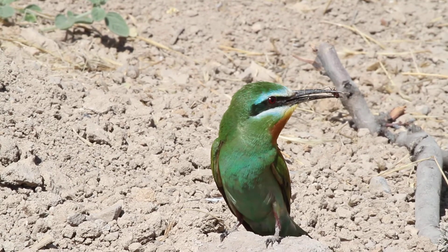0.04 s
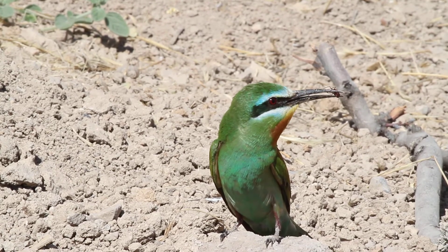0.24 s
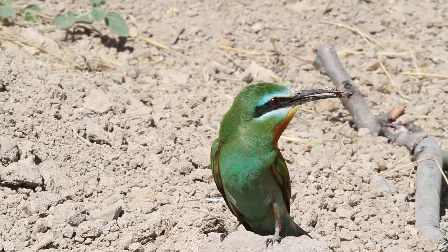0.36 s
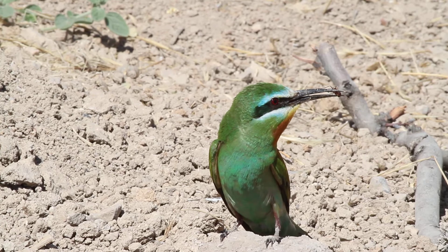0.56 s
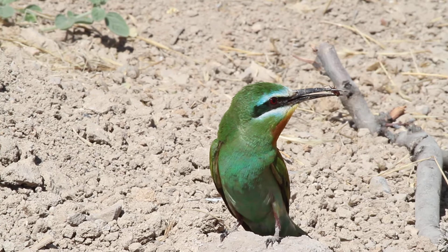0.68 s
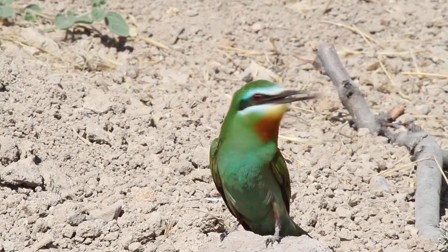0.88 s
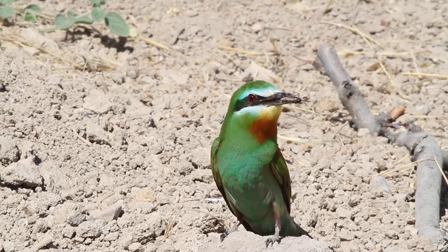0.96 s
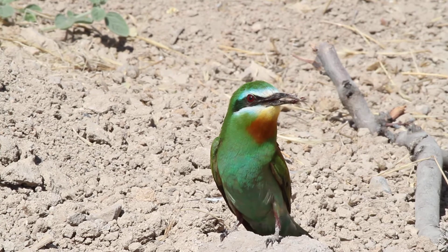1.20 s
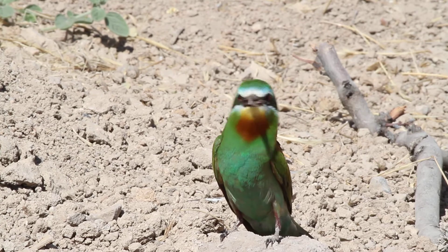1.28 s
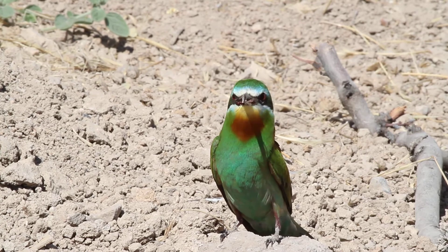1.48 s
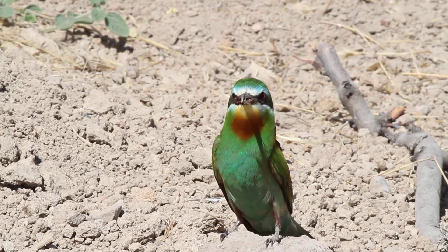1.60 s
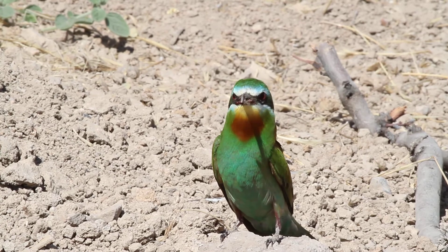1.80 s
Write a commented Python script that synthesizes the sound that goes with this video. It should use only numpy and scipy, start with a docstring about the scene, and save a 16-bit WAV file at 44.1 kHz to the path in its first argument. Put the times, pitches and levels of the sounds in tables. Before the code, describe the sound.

Bird calls outdoors: sharp paired sparrow-like chirps with low rolling bee-eater whistles over faint air

```python
"""Faint air and a distant chorus of blurred twitter, both of shaped noise or arched tones, lie over dry open ground.
Bee-eaters give low rolling whistles, which are nearly pure tones along pitch curves, from faint to clear.
A sparrow-like bird repeats a paired chirp: each rasps in, then both sides of its syrinx sing beating arches.
Short arched notes, among them a two-voiced chirp near 1 s, and two soft noise thumps fall between; the ground
returns a diffuse tail to the birds; the sound is mono."""
import sys
import numpy as np
from scipy import signal
from scipy.fft import rfft, irfft
from scipy.io import wavfile
from scipy.ndimage import uniform_filter1d

SR = 44100
rng = np.random.default_rng(int(sys.argv[2]) if len(sys.argv) > 2 else 0)


def wrap_up_sound(samples):
    """Save the sound to the file named by the first command line argument, as 16-bit audio."""
    columns = np.atleast_2d(samples).T
    # keep every value between -1 and 1, then stretch to whole-number steps
    tamed = np.clip(columns, -1, 1)
    steps = np.round(tamed * 32767).astype(np.int16)
    wavfile.write(sys.argv[1], SR, steps)


N = 81585
T = np.arange(N) / SR  # time [s]

# spectrum of the distant chorus: (frequency [Hz], level [dB])
CHORUS_SPECTRUM = [(1500, -24.5), (2500, -14.5), (3700, -2), (5600, -3.5), (7200, -15), (11000, -24.5),
                   (15500, -40)]
# spectrum of the breath hiss in whistles and notes: (frequency [Hz], level [dB])
BREATH_SPECTRUM = [(1500, -24), (2700, -11), (3700, 3), (5800, 3), (7300, -16), (11000, -8), (15500, -31)]


def undb(db):
    """Amplitude ratio: 20 dB is a factor of ten."""
    return 10 ** (np.asarray(db) / 20)


def colour(x, points):
    """Linear filtering: each frequency is weighted by a response of (frequency [Hz], gain [dB]) points."""
    hz, db = np.array(points).T
    f = np.maximum(np.arange(N // 2 + 1) * SR / N, 1)
    response_db = np.interp(np.log(f), np.log(hz), db)
    return irfft(rfft(x) * undb(response_db), N)


def noise(points):
    """Filtered Gaussian noise: white noise takes the spectrum of the points, at rms 1."""
    y = colour(rng.standard_normal(N), points)
    return y / y.std()


def wobble(hz):
    """Low-passed random motion: amplitude is halved at the given rate and falls above; standard deviation 1."""
    f = np.arange(N // 2 + 1) * SR / N
    y = irfft(rfft(rng.standard_normal(N)) / (1 + (f / hz) ** 2), N)
    return y / y.std()


def glide(times, values, size=110):
    """Piecewise-linear control, its corners rounded by a moving average of size samples."""
    return uniform_filter1d(np.interp(T, np.sort(times), values), size)


def loudness(times, db, size=130):
    """Amplitude envelope: gain through dB points, silent outside them, smoothed over size samples."""
    sounding = (T > min(times)) * (T < max(times))
    return uniform_filter1d(undb(np.interp(T, np.sort(times), db)) * sounding, size)


def turn(hz):
    """Phase [rad] as the time integral of a moving frequency."""
    return 2 * np.pi * np.cumsum(hz) / SR


def scatter(x):
    """Diffuse scattering: rough ground and bushes return a decaying noise tail, by convolution."""
    tail_spectrum = [(500, 0), (2000, -10.5), (3500, -9), (6000, -6.5), (12000, -0.5), (16000, -3)]  # (frequency [Hz], level [dB])
    level_db, t60_s, delay_s = -10.5, 0.19, 0.0047
    decay = np.exp(-np.log(1000) * T / t60_s)
    tail = noise(tail_spectrum) * (T > delay_s) * decay
    tail = tail / np.linalg.norm(tail)  # unit energy
    return undb(level_db) * signal.fftconvolve(x, tail)[:N]


def twitter():
    """Superposition of many far arched chirps at random times, smeared by their echoes; rms 1."""
    chirps_per_s, centre_hz, pitch_spread = 69, 5052, 0.16
    mean_length_s, arch, echo_lift_db = 0.055, .2, 33
    out = 0
    for when, pitch, length, lean in rng.random((int(chirps_per_s * N / SR), 4)):
        # u runs from -1 to 1 over one chirp
        u = np.clip(2 * (T - when * N / SR) / (mean_length_s * (.5 + length)), -1, 1)
        top_hz = centre_hz * (1 + pitch_spread * (2 * pitch - 1))
        hz = top_hz * (1 - arch * (u + lean - .5) ** 2)
        out = out + (1 - u ** 2) * np.sin(turn(hz))
    out = colour(out + undb(echo_lift_db) * scatter(out), CHORUS_SPECTRUM)
    return out / out.std()


def background():
    """Incoherent sum: faint air noise and a chorus whose noise and twitter share the power."""
    air_spectrum = [(20, -16), (50, 2), (100, -3), (300, 0), (700, -6), (1500, -3.5), (3000, -4),
                    (9000, -15.5), (15500, -12)]  # (frequency [Hz], level [dB])
    # slow swell of the distant chorus: (time [s], level [dB])
    chorus_level = [(0, -45), (.12, -52), (.3, -37.5), (.53, -43), (.7, -42.5), (1.12, -39), (1.26, -48),
                    (1.45, -36.5), (1.62, -42), (1.77, -40), (1.85, -37.5)]
    air_db, flutter_db, twitter_share = -56, 1.48, 0.39
    chorus = np.sqrt(1 - twitter_share) * noise(CHORUS_SPECTRUM) + np.sqrt(twitter_share) * twitter()
    chorus_db = glide(*np.array(chorus_level).T) + flutter_db * wobble(40)
    return undb(air_db) * noise(air_spectrum) + chorus * undb(chorus_db)


def whistles():
    """Frequency modulation: nearly pure rolling tones with faint flickering overtones and a little hiss."""
    # bee-eater calls, each a list of (time [s], pitch [Hz], level [dB])
    calls = [
        [(.561, 1268, -46), (.566, 1410, -37), (.573, 1631, -32), (.580, 1717, -23), (.599, 1867, -19),
         (.607, 2160, -16.5), (.615, 1850, -19), (.627, 1834, -24), (.634, 2158, -18.5), (.638, 1930, -16.5),
         (.642, 2160, -16.5), (.652, 1757, -26), (.660, 2030, -19.5), (.666, 1794, -21), (.676, 1906, -20.5),
         (.686, 1663, -25), (.690, 1490, -48), (.697, 1090, -43.5)],
        [(.867, 1437, -34.5), (.880, 1702, -19.5), (.904, 1813, -15), (.913, 2307, -8), (.921, 1864, -17),
         (.934, 1880, -27), (.941, 2069, -15), (.944, 2123, -12.5), (.951, 2240, -11.5), (.955, 1872, -32),
         (.964, 2034, -23.5), (.973, 1835, -26.5), (.981, 1958, -30.5), (.993, 1680, -26), (1.004, 1016, -53.5)],
        [(.945, 1745, -56), (.965, 1590, -43), (.990, 1623, -34.5), (1.012, 1742, -37.5), (1.018, 2253, -29),
         (1.025, 1874, -28), (1.038, 1770, -31), (1.050, 1476, -50.5), (1.060, 1060, -62)],
        [(.762, 1343, -48), (.772, 1724, -37), (.783, 2195, -34.5), (.790, 2287, -28.5), (.797, 2684, -32.5),
         (.804, 2217, -44), (.823, 1640, -43), (.848, 1528, -41), (.872, 1556, -41.5)],
        [(1.786, 1378, -44.5), (1.797, 1785, -37), (1.807, 2130, -35), (1.815, 2290, -26), (1.822, 2670, -32),
         (1.830, 2200, -44.5), (1.850, 1630, -45.5)],
        [(.020, 1738, -61.5), (.138, 1900, -60.5), (.148, 1766, -45.5), (.165, 1470, -58.5), (.200, 1515, -63),
         (.245, 1559, -63)],
        [(1.595, 1450, -56.5), (1.650, 1590, -55), (1.690, 1737, -55), (1.715, 1740, -64)],
    ]
    # filter on overtones 2 to 8: (frequency [Hz], gain [dB])
    overtone_response = [(2500, -20), (3600, -18), (4400, -21), (5800, -26), (7500, -45), (10000, -57),
                         (11300, -28.5), (15500, -31)]
    pitch_jitter, flutter_db, flicker_db, hiss_db = 0.0078, 1.07, 5, -29
    hiss = undb(hiss_db) * noise(BREATH_SPECTRUM)
    waver = 1 + pitch_jitter * wobble(205)
    flutter = undb(flutter_db * wobble(73))
    flicker = {k: undb(flicker_db * wobble(81)) for k in range(2, 9)}
    out, overtones = 0, 0
    for call in calls:
        s, hz, db = np.array(call).T
        phase = turn(glide(s, hz) * waver)
        gain = loudness(s, db)
        out = out + gain * (np.sqrt(2) * np.sin(phase) * flutter + hiss)
        overtones = overtones + gain * sum(g * np.sin(k * phase) for k, g in flicker.items())
    return out + colour(overtones, overtone_response)


def chirp(points, lead_hz, rasp_db, tremble_db):
    """Nonlinear mixing: two voices rasp in, snap into beating arches and fall, with combination tones."""
    # hoarse hiss, timed from the start of the arch: (time [s], level [dB])
    hiss_level = [(-.054, -50), (-.04, -39), (-.02, -33), (-.004, -27.5), (.006, -48), (.035, -36.5),
                  (.06, -47)]
    hiss_spectrum = [(1500, -55), (2500, -15), (3500, -22), (5500, 1), (7500, 2.5), (9700, -12),
                     (12000, -2), (15500, -0.5)]  # (frequency [Hz], level [dB])
    # the lead-in starts, rises and snaps clear this long before the arch
    lead_s, rise_s, snap_s = 0.042, .016, 0.00497
    lead_db, rise_db, snap_db = -46, -32, -28
    lead_ratio, snap_pitch = 1.18, .87  # upper to lower lead-in; snap to first arch pitch
    # after the arch both voices fall and fade
    fall_s, fade_s, fall_db, fade_db = 0.0083, 0.017, -32, -46
    end_upper_hz, end_lower_hz = 5370, 3830
    jitter_hz, flutter_hz = 711, 219
    # partials, relative to the geometric mean of the two voices
    octave_db, sum_tone_db, rasp_octave_db = -19.5, -16.5, -4.5
    half_db, three_halves_db, sideband_db = -19.5, -28, -22

    s, upper_hz, lower_hz, upper_db, lower_db = np.array(points).T
    start, end = s[0], s[-1]
    times = np.r_[start - lead_s, start - rise_s, start - snap_s, s, end + fall_s, end + fade_s]
    rough = glide([start - snap_s, start], [1, 0])  # 1 in the lead-in, 0 in the arch
    jitter = 0.00703 * tremble_db + 0.065 * rough  # fraction of the pitch

    def voice(hz, db, lead, end_hz):
        """Phase and gain of one side of the syrinx, a vibrator with its own random jitter and tremble."""
        pitch = glide(times, np.r_[lead, lead, snap_pitch * hz[0], hz, end_hz, end_hz])
        lead_in_db = np.array([lead_db, rise_db, snap_db]) + rasp_db
        gain = loudness(times, np.r_[lead_in_db, db, fall_db, fade_db], size=90)
        phase = turn(pitch * (1 + jitter * wobble(jitter_hz)))
        return phase, gain * undb(tremble_db * wobble(flutter_hz))

    upper, upper_gain = voice(upper_hz, upper_db, lead_hz * lead_ratio, end_upper_hz)
    lower, lower_gain = voice(lower_hz, lower_db, lead_hz, end_lower_hz)
    voices = upper_gain * np.sin(upper) + lower_gain * np.sin(lower)
    octaves = undb(octave_db) * (.5 * np.sin(2 * lower) + np.sin(2 * upper))
    sum_tone = undb(sum_tone_db) * np.sin(lower + upper)
    half_tones = undb(half_db) * np.sin(upper / 2) + undb(three_halves_db) * np.sin(upper + lower / 2)
    sideband = undb(sideband_db) * np.sin(2 * lower - upper)
    harsh = undb(rasp_octave_db) * rough * (np.sin(2 * lower) + .5 * np.sin(2 * lower + upper))
    partials = octaves + sum_tone + half_tones + sideband + harsh
    partial_gain = np.sqrt(upper_gain * lower_gain + 1e-14)
    hiss_s, hiss_db = np.array(hiss_level).T
    hiss = loudness(start + hiss_s, hiss_db + rasp_db) * noise(hiss_spectrum)
    return voices + partial_gain * partials + hiss


def chirps():
    """Source and filter: three pairs of chirps pass the resonances of the bird's throat and beak."""
    # arch of each chirp, at the source:
    # (time [s], upper voice [Hz], lower voice [Hz], upper level [dB], lower level [dB])
    arches = [
        [(.247, 5450, 4550, -22, -20), (.254, 6200, 5500, -26, -18), (.261, 6450, 5600, -21, -16),
         (.276, 5950, 5450, -22, -15), (.285, 5850, 4700, -24, -21)],
        [(.360, 5450, 4650, -20, -18), (.368, 5750, 5250, -19, -23), (.381, 5880, 5580, -19, -16),
         (.392, 5700, 5100, -22, -21), (.401, 5500, 4600, -28, -21)],
        [(.795, 5300, 4450, -29, -22), (.802, 5950, 5450, -26, -21), (.813, 6150, 5300, -26, -23),
         (.825, 5950, 5450, -28, -19), (.835, 5800, 4600, -24, -20)],
        [(.907, 5400, 4600, -23, -19), (.912, 5720, 5100, -19, -28), (.928, 5780, 5350, -20, -21),
         (.938, 5750, 5100, -23, -26), (.945, 5600, 4400, -29, -27)],
        [(1.342, 5300, 4550, -27, -20), (1.349, 5950, 5400, -27, -20), (1.365, 6100, 5750, -29, -16),
         (1.380, 5800, 5450, -20, -17), (1.394, 5800, 4550, -25, -21)],
        [(1.459, 5300, 4600, -25, -20), (1.466, 5700, 5100, -18, -26), (1.480, 5750, 5400, -21, -19),
         (1.489, 5750, 5050, -21, -27), (1.496, 5700, 4750, -26, -26)],
    ]
    # manner of each chirp: (lower lead-in pitch [Hz], added rasp level [dB], tremble [dB])
    manners = [(3960, 0.5, 2.15), (3235, 3, 0.8), (3860, 0.5, 3.5), (3250, 0.5, 1.4), (3880, 1, 1.8),
               (3310, 0.5, 0.8)]
    # throat and beak response: (frequency [Hz], gain [dB])
    throat = [(1200, -26), (2200, -30), (2900, -2), (5700, -0.5), (7500, -1.5), (9900, 2), (15500, -9)]
    source = sum(chirp(points, *manner) for points, manner in zip(arches, manners))
    return colour(source, throat)


def notes():
    """Quadratic pitch sweeps under a half-sine envelope: short notes, some hoarse with breath noise."""
    # short notes; the rows from 0.982 to 0.994 overlap as one two-voiced chirp:
    # (start [s], length [s], first pitch [Hz], middle pitch [Hz], last pitch [Hz],
    # level [dB], hiss relative to the tone [dB])
    short_notes = [(0.442, 0.029, 4300, 3670, 3440, -38.5, 5.5),
                   (0.464, 0.017, 3537, 3970, 4320, -33.5, -3.5),
                   (0.478, 0.013, 4240, 4470, 4400, -28.5, -4), (0.958, 0.022, 3450, 4710, 5630, -35, -8),
                   (0.982, 0.0247, 5950, 5750, 5300, -36.5, -16), (0.983, .018, 3100, 4950, 5300, -27, -19),
                   (0.994, 0.026, 5420, 5100, 4230, -25.5, -16.5),
                   (0.993, 0.034, 3250, 4740, 3390, -23.5, -20),
                   (1.056, 0.031, 3190, 3580, 4030, -26.5, -21), (1.077, 0.0233, 3900, 3150, 2730, -42, -1),
                   (1.134, .060, 3740, 4070, 3760, -41.5, -11), (1.533, 0.028, 3560, 3700, 3930, -39, 3.5),
                   (1.553, 0.034, 4170, 4656, 4690, -27.5, -10),
                   (1.708, 0.031, 5570, 5000, 4280, -41.5, -10)]
    octave_db, pitch_jitter = -19.5, 0.0073
    hiss = noise(BREATH_SPECTRUM)
    waver = 1 + pitch_jitter * wobble(770)
    out = 0
    for start, length, first_hz, middle_hz, last_hz, db, hiss_db in short_notes:
        u = np.clip((T - start) / length, 0, 1)  # progress through the note
        curve = np.polyfit([0, .5, 1], [first_hz, middle_hz, last_hz], 2)
        phase = turn(np.polyval(curve, u) * waver)
        tone = np.sqrt(2) * np.sin(phase) + undb(octave_db) * np.sin(2 * phase)
        out = out + undb(db) * np.sin(np.pi * u) * (tone + undb(hiss_db) * hiss)
    return out


def thumps():
    """Exponential decay of low noise: brief dull puffs, perhaps wing beats."""
    # (time [s], level [dB], decay time constant [s])
    puffs = [(0.667, -39, 0.012), (1.003, -40.5, 0.0057)]
    puff_spectrum = [(40, -4.5), (110, -5.5), (280, -1.5), (480, -7), (800, -19.5), (2000, -60)]  # (frequency [Hz], level [dB])
    envelope = sum(undb(db) * (T > s) * np.exp(-np.abs(T - s) / decay) for s, db, decay in puffs)
    return noise(puff_spectrum) * uniform_filter1d(envelope, size=180)


def scene():
    """Superposition: the near birds with their echoes, thumps and background, alike in both channels."""
    birds = whistles() + chirps() + notes()
    return np.tile(background() + birds + scatter(birds) + thumps(), (2, 1))


def record(dry):
    """Band limiting: the recorder cuts the top with a steep elliptic low-pass."""
    top_hz = 15600
    low_pass = signal.ellip(10, .2, 80, top_hz, fs=SR, output="sos")  # order, ripple [dB], stop [dB]
    return signal.sosfilt(low_pass, dry)


dry = scene()
out = record(dry)
wrap_up_sound(out)
```